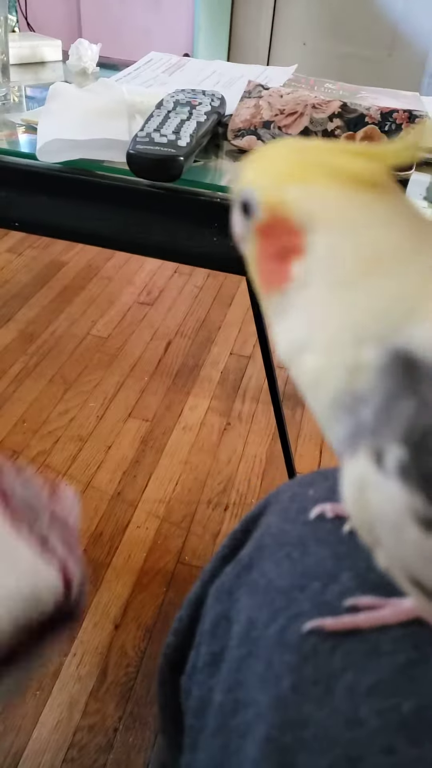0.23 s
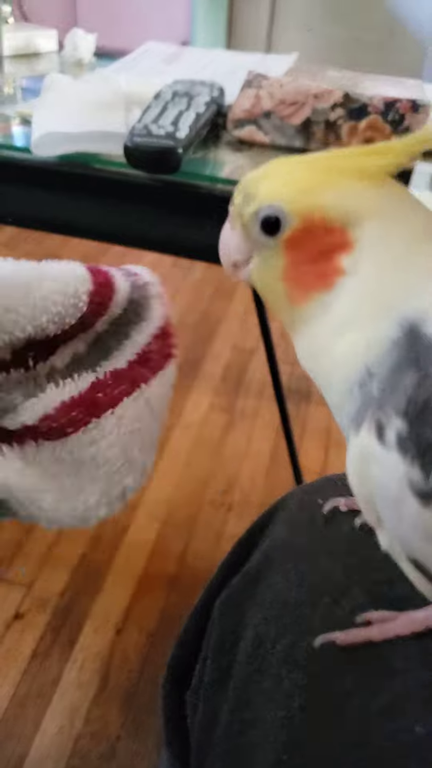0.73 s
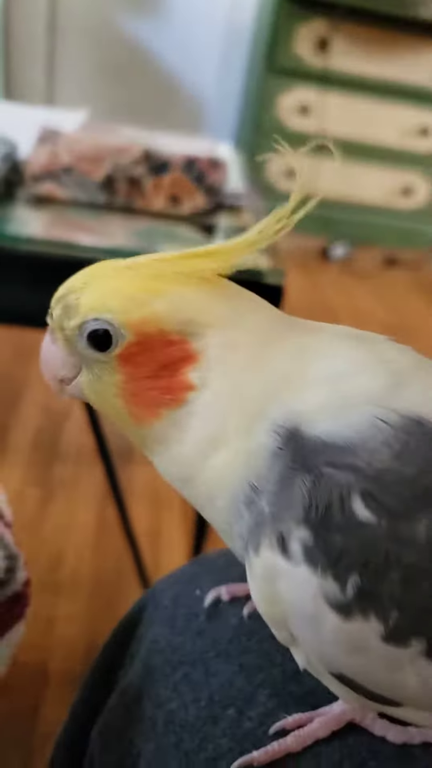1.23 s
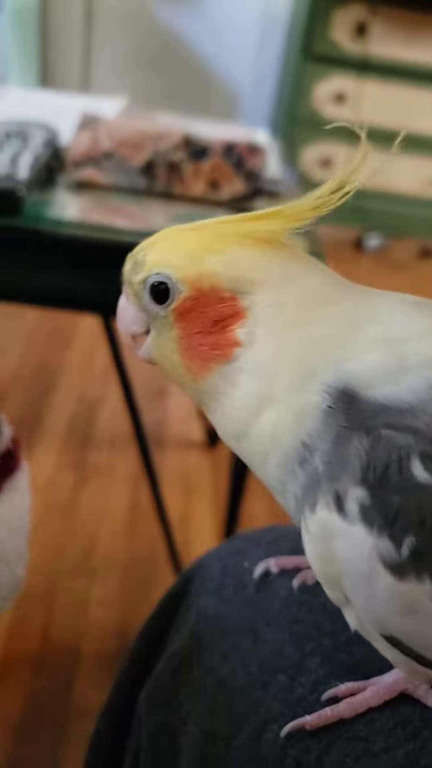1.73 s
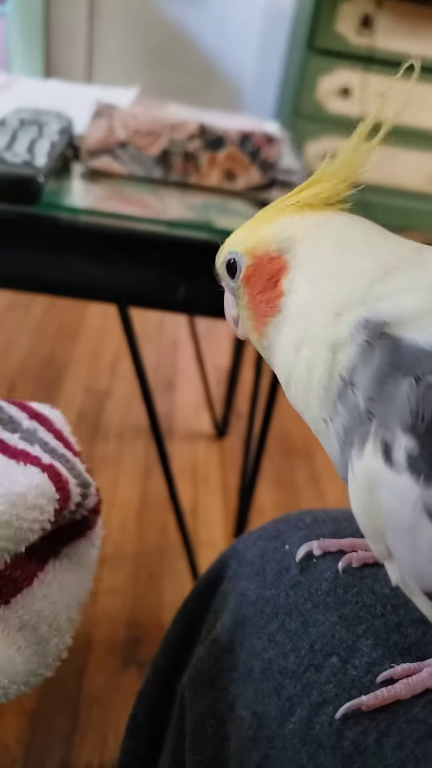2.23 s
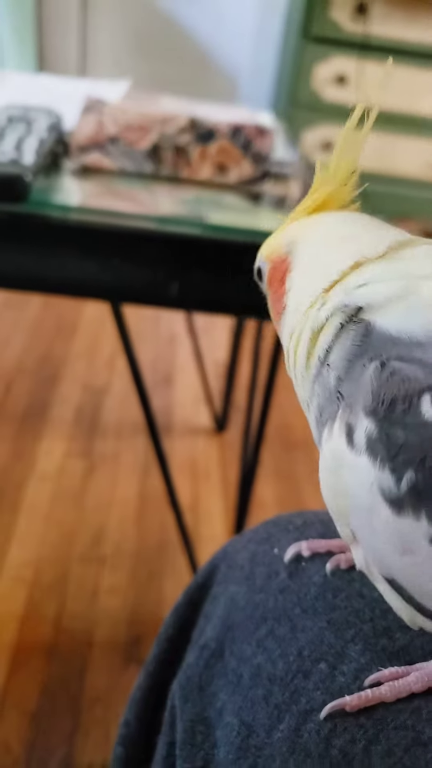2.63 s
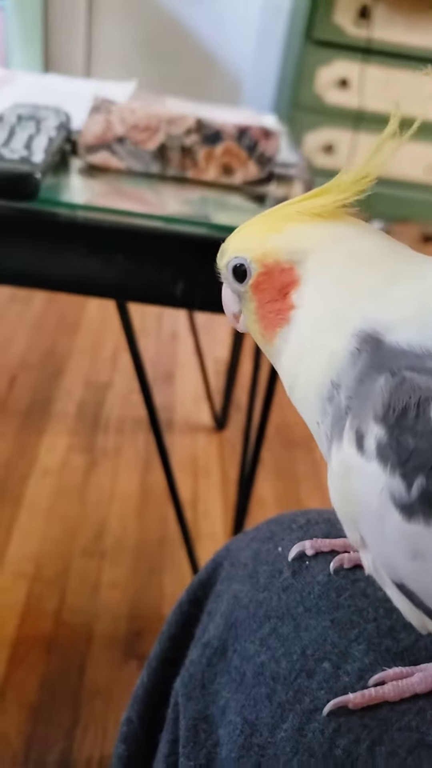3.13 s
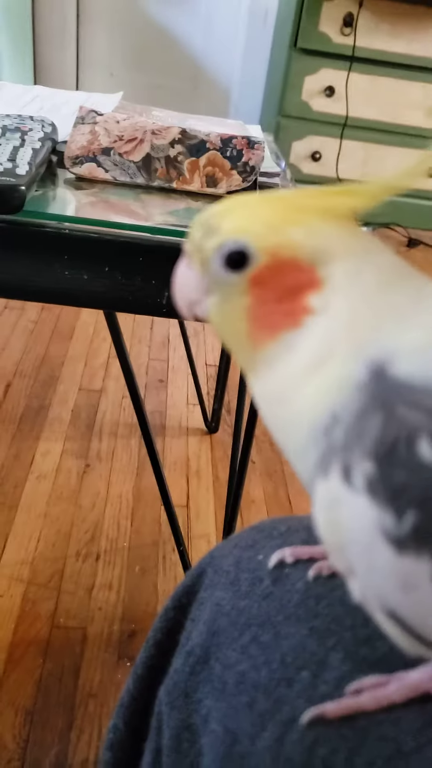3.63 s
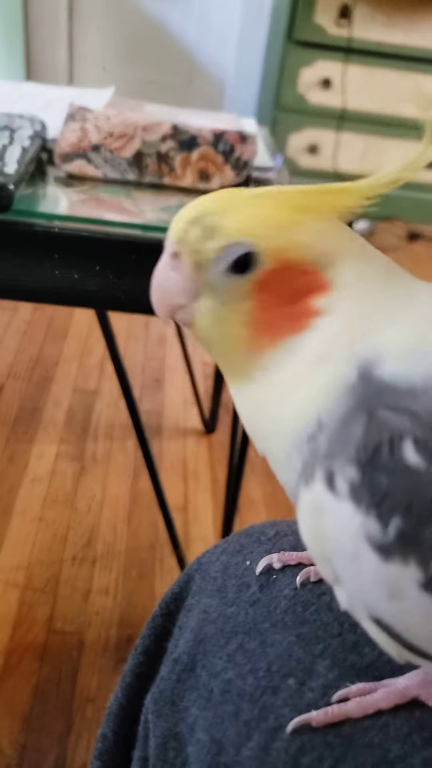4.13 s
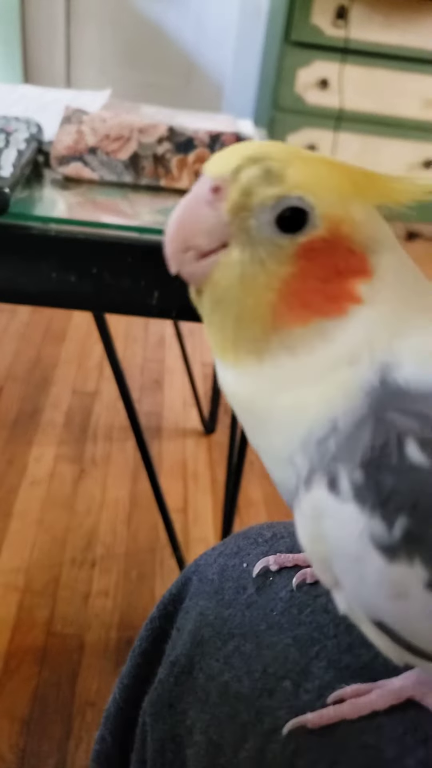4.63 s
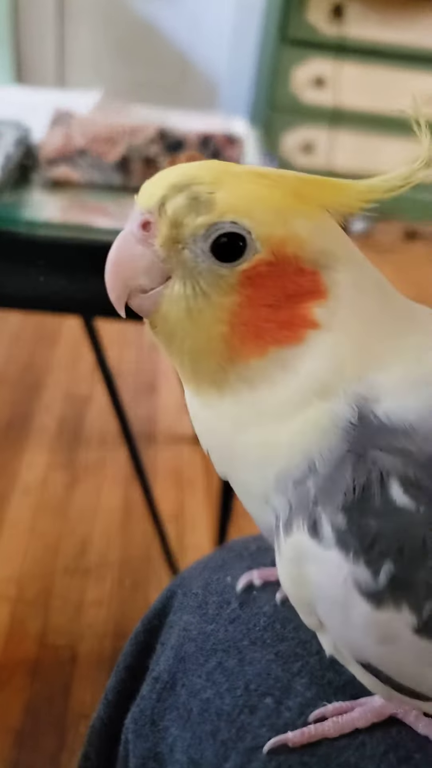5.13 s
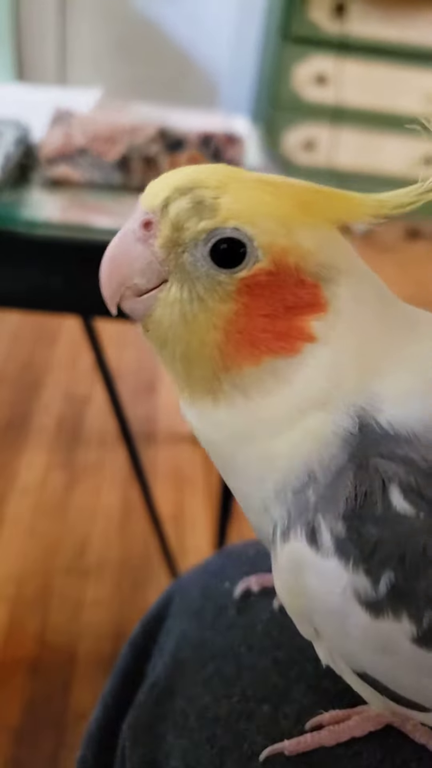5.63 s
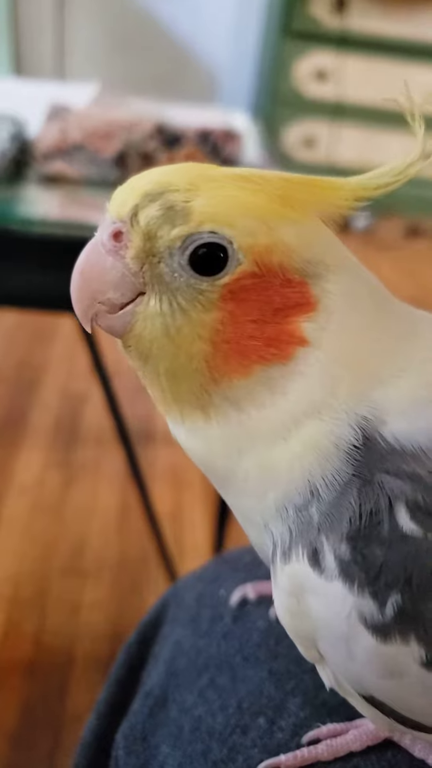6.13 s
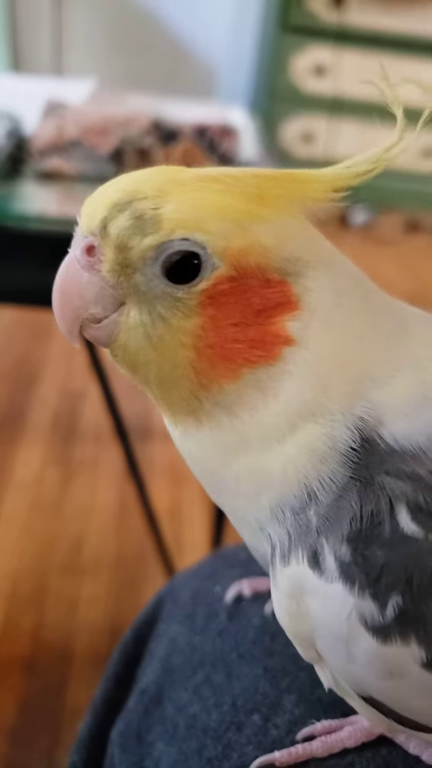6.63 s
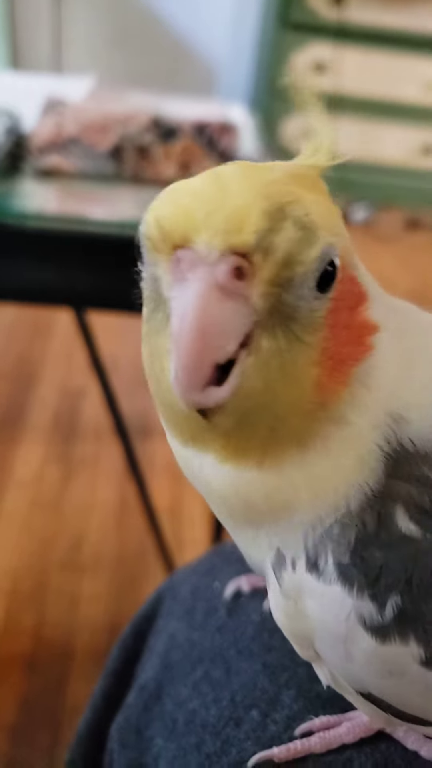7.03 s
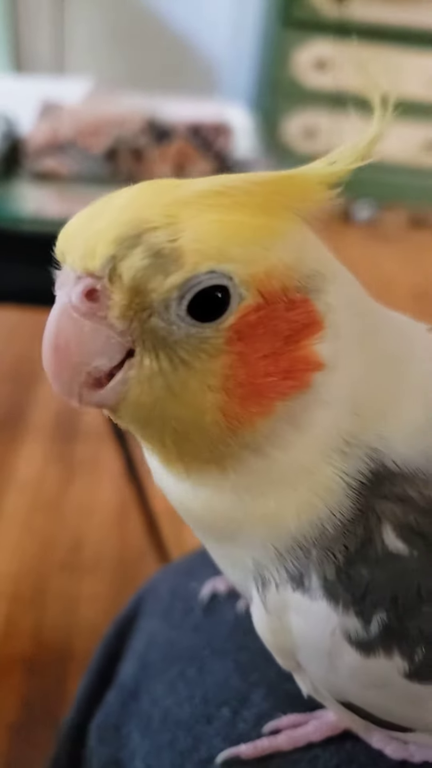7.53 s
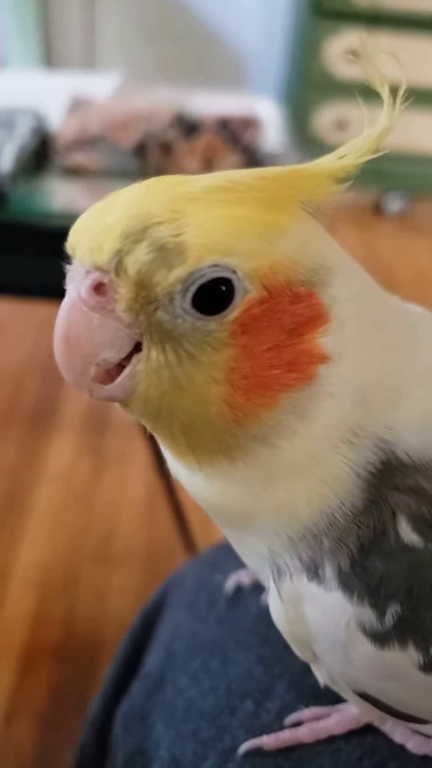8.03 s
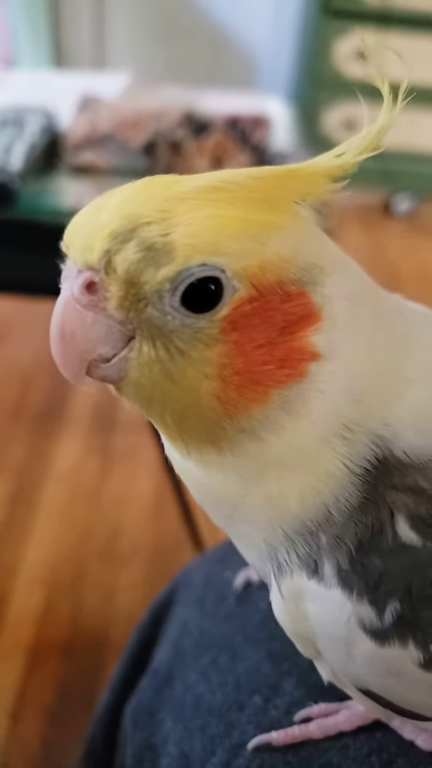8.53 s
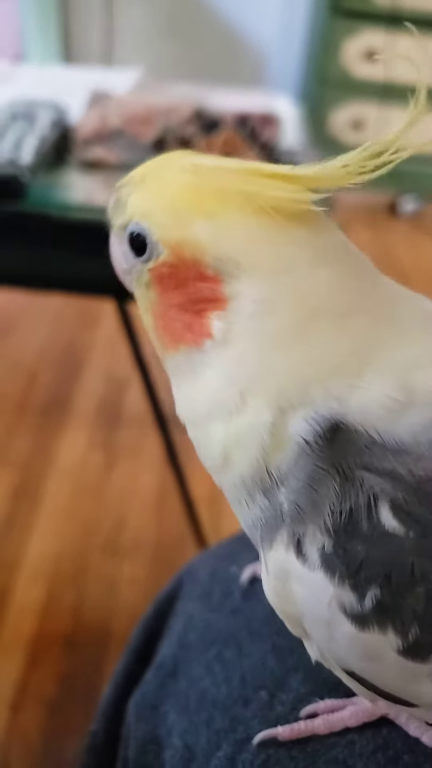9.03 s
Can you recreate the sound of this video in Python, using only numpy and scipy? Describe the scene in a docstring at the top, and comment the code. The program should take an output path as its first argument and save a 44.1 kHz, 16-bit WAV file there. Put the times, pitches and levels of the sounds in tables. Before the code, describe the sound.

A cockatiel sings close to a phone in a quiet living room with a faint low hum and short, lively reflections. From 0 to 1.1 s, bright chirps and stepping whistles come quickly, the loudest near 0.3 and 0.8 s, the last turning raspy. From 1.25 to 2.6 s more short chirps and rising whistles follow, some buzzy or split to half pitch. Softer chirps and hoarse wheezing lead to a screech at 3.2-3.5 s, cracking from low to thin high voice. A faint rustle passes around 4.1 s; chirps with a tiny squeak at 4.3-4.6 s precede a strong whistle at 4.7 s that drops sharply. Near silence follows, with a very soft rustle at 5.6 s. Two short peeps at 6 s lead to a clear whistle at 6.3 s. From 6.9 to 8.3 s, a nasal, rapid warble runs on, ending with a weaker breaking screech until 8.6 s, then quiet hum.

```python
"""Arched chirps and stepping whistles, rich in overtones, ring out close to a phone in a living room.
A cockatiel sings them on someone's knee, over a wooden floor: stacks of harmonics on a gliding pitch.
Some notes split to half pitch, some turn raspy as pitch and level shake, and two phrases end in a
two-voiced screech. Hoarse air and thin squeaks join in; noise makes the low room hum and cloth rustle.
The two microphones differ in level and phase; decaying noise gives the room's reflections."""
import sys
import numpy as np
from scipy import signal
from scipy.fft import rfft, irfft, next_fast_len
from scipy.io import wavfile

SR = 44100
rng = np.random.default_rng(int(sys.argv[2]) if len(sys.argv) > 2 else 0)


def generate_wav(sig):
    """Save sig (samples, or channels by samples) to the path in sys.argv[1] as 16-bit PCM at SR."""
    pcm = np.round(np.clip(np.atleast_2d(sig).T, -1, 1) * 32767).astype(np.int16)
    wavfile.write(sys.argv[1], SR, pcm)


N = 409248

# room background: (frequency [Hz], density [dB per Hz])
HUM_SPECTRUM = [(25, -27), (100, -1.5), (160, -18.5), (320, -21.5), (900, -40), (2200, -32), (3500, -44.5),
                (15000, -49)]
# chirps, one arch of pitch on a glide: (start [s], length [s], pitch [Hz], glide [semitones],
# arch [semitones], level [dB], second harmonic [dB], upper overtones [dB])
CHIRP_CALLS = [(0.025, 0.023, 1640, -2.5, 1.7, -31.5, 5, -6),
               (0.569, 0.089, 1641, 1.5, 1.3, -25, 3.5, -2.5),
               (0.726, 0.058, 1965, 4, 1.2, -27, -13.5, -13.5),
               (0.825, 0.17, 2030, 0.3, 1.45, -14.5, -5.5, -8.5),
               (1.0, 0.12, 2118, -2, 1.2, -32.5, -9.5, -9.5),
               (1.255, 0.085, 1506, -1.5, 2.24, -29, -2.5, -4),
               (1.431, 0.086, 1986, -0.4, -0.29, -19.5, -2.5, -3),
               (1.525, 0.05, 2016, 4.5, -1.83, -28.5, -13.5, -9.5),
               (1.838, 0.066, 1746, -3, -1.1, -31.5, -7.5, 0),
               (2.52, 0.089, 2009, 2, 1.6, -33, -8.5, -10.5),
               (2.725, 0.066, 1587, 2.5, -0.082, -28.5, -20, -10),
               (2.89, 0.073, 1770, -0.1, -0.54, -29.5, -17, -10.5),
               (3.075, 0.082, 1709, -1, 0.018, -31, -15, -10),
               (4.334, 0.041, 1353, -1, 0.7, -29.5, -0.5, 1.5), (4.394, 0.086, 1501, 3, 1, -25.5, 1.5, 1),
               (4.544, 0.082, 1799, -4.5, -1.67, -18.5, 4, -1.5),
               (5.98, 0.04, 1679, -1, 0.93, -26.5, -5, 1.5),
               (6.155, 0.041, 1821, -0.5, -0.36, -25.5, -12.5, -18.5),
               (6.937, 0.11, 1701, 1.33, 0.17, -19.5, 8.5, 5.5), (7.075, 0.18, 1728, 0.9, 1.04, -22, 4, 4),
               (7.547, 0.07, 1725, 2.5, -0.66, -23.5, -4, 6), (7.731, 0.087, 1611, 1, 0.87, -25, -5.5, 1),
               (7.877, 0.11, 1697, -0.5, 2.05, -24.5, -1, 5),
               (7.962, 0.063, 1620, -0.7, 0.14, -26.5, -3.5, 0),
               (8.025, 0.16, 1724, -1.17, 2, -21.5, -1.5, 2.5),
               (8.178, 0.052, 1570, 0.8, -0.47, -29, -32, -6), (8.235, 0.1, 1773, 1, 0.9, -33, -12, -9.5)]
# whistles hold a pitch, step quickly (mostly up, once slightly down) and fall away:
# (start [s], length [s], held pitch [Hz], reached pitch [Hz], step after [s], fall [semitones],
# fall time [s], level [dB], second harmonic [dB], upper overtones [dB])
WHISTLE_CALLS = [(.129, 0.11, 1786, 2062, 0.069, 0.46, 0.012, -18.5, -6, -5.5),
                 (.287, 0.15, 2096, 2000, 0.052, 0.69, 0.04, -15.5, -7.5, -13.5),
                 (1.69, 0.077, 1600, 1862, 0.041, 1.06, 0.019, -26.5, -0.5, 2.5),
                 (2.028, 0.084, 1636, 1910, 0.044, 2, 0.0093, -24, -1, 0),
                 (2.206, 0.13, 1736, 1879, 0.029, 0.56, 0.1, -24.5, -6, -2.5),
                 (2.345, .16, 1900, 2136, 0.029, 2.68, 0.066, -18.5, -6, -7.5),
                 (4.71, .26, 1683, 1987, .12, 7, .025, -15, -4, -2.5),
                 (6.317, 0.24, 1729, 1957, 0.083, 8.9, 0.023, -16, -10, -9),
                 (7.297, 0.12, 1832, 2195, 0.032, 3.29, 0.077, -17.5, -3.5, -1)]
# the syrinx vibrates chaotically: (start [s], end [s], rasp [0-1])
RASP_SPANS = [(1.023, 1.105, 0.79), (1.309, 1.345, 0.29), (1.845, 1.876, 0.58), (2.203, 2.224, 0.41),
              (2.503, 2.579, 0.72), (4.46, 4.486, 0.7), (4.541, 4.557, 0.44), (7.225, 7.246, 0.36),
              (8.234, 8.272, 0.74)]
# strong and weak cycles alternate, giving lines at half the pitch: (start [s], end [s])
SPLIT_SPANS = [(1.255, 1.31), (1.528, 1.567), (1.676, 1.725), (2.02, 2.065), (4.73, 4.795), (7.554, 7.597),
               (7.744, 7.795), (7.967, 7.998), (8.182, 8.222)]
# colour of windpipe and beak: (frequency [Hz], gain [dB])
THROAT_COLOUR = [(400, -34.5), (800, -7.5), (1700, 7.5), (3400, 4), (3800, -0.5), (5200, -10),
                 (6300, -22.5), (8400, -29), (9600, -47.5), (11300, -25.5), (13200, -30.5), (14700, -19.5)]
# turbulent air, before the throat colours it: (frequency [Hz], density [dB per Hz])
AIR_SPECTRUM = [(800, 2.5), (1500, -17), (2100, -1.5), (3000, 0), (3600, -13), (5000, -0.5)]
# the bird moves its head: (time [s], left-right level [dB])
HEAD_BALANCE = [(0.548, 16.5), (0.851, 7), (2.898, 10)]
# left-right balance of the two microphones, on top of the head's own: (frequency [Hz], level [dB])
MIC_BALANCE = [(2000, 2.5), (7000, -14)]
# sound reaches the left microphone first, bent round the phone: (frequency [Hz], phase lead [radians])
MIC_PHASE = [(1650, 2.5), (2000, 0.089), (2750, 0.19), (3250, 3.67), (5100, 5.43), (15000, 21.13)]
# reverberation time of the room: (frequency [Hz], decay by 60 dB [s])
ROOM_DECAY = [(2500, 0.3), (12000, 0.52)]
# hoarse rasping that carries on between notes: (start [s], end [s], level [dB])
HOARSE_SPANS = [(0.253, 0.296, -43.5), (2.772, 2.947, -47.5), (2.95, 3.113, -42.5)]
# screeches break from a low voice to a high one:
# (start [s], break [s], end [s], low pitch [Hz], high pitch [Hz], level [dB])
SCREECH_CALLS = [(3.203, 3.303, 3.472, 1751, 2750, -26), (8.342, 8.414, 8.603, 1676, 2811, -34)]
# the wide-open beak colours the screeches further: (frequency [Hz], gain [dB])
BEAK_COLOUR = [(5000, -1.5), (10000, 10), (14000, -22)]
# cloth and feathers rustle: (start [s], end [s], level [dB])
RUSTLE_SPANS = [(4.08, 4.288, -57.5), (5.628, 5.833, -61)]
# colour of the rustle: (frequency [Hz], density [dB per Hz])
CLOTH_SPECTRUM = [(70, 3.5), (9000, -33.5)]
# thin squeaks where the voice cracks: (start [s], length [s], pitch [Hz], glide [semitones], level [dB])
SQUEAK_CALLS = [(4.538, .005, 4400, 0, -21), (7.243, .045, 3450, -6, -37), (7.293, .005, 4450, -2, -30)]

TIME = np.arange(N) / SR
HUM_DB = -66.5
CUTOFF_HZ, FULL_SCALE = 16100, .95
# breath: loudness per semitone [dB], drop at both ends [dB], attack [s], release [s]
BREATH = (1.6, 8.8, .006, .038)
SCREECH_BREATH = (0, 4, .005, .008)   # high voice only
SWELL_LEAN = 1.125   # above 1, the breath is strongest a little after the middle of a call
# a call starts flat by about this share of its pitch and settles with a dying wobble
SAG, SETTLE_S, SETTLE_HZ = .045, .02, 24.54
# random wavering of the pitch: share, highest rate
WAVER, WAVER_HZ = .008, 55
SMEAR = 1.1   # overtone phase jitter at full rasp [radians per harmonic], before its cap
# least rasp (0-1) of a split tone and of a straining or starting voice; most of a screech's high voice
SPLIT_RASP, STRAIN_RASP, SCREECH_RASP = .05, .18, .38
SPLIT_DB = -21   # half-pitch lines, about which they waver
RASP_EDGE_S, SQUEAK_EDGE_S = .009, .004
WHISTLE_STEP_S = 0.013
HOARSE_HZ = 1980
STUTTER_HZ, STUTTER_DEPTH = 85, .6


def from_db(db):
    """Turns decibels into an amplitude ratio."""
    return 10 ** (np.asarray(db) / 20)


def rms_one(x):
    """Scales a signal to an RMS level of 1."""
    return x / np.sqrt(np.mean(x ** 2) + 1e-20)


def at_hz(points, hz):
    """Reads a spectrum on a log-frequency axis."""
    points = np.array(points, float)
    return np.interp(np.log(np.maximum(hz, 1)), np.log(points[:, 0]), points[:, 1])


def coloured(x, points):
    """Filters by a spectrum of (frequency [Hz], gain [dB])."""
    size = next_fast_len(x.shape[-1])
    hz = np.arange(size // 2 + 1) * SR / size
    spectrum = rfft(x, size) * from_db(at_hz(points, hz))
    return irfft(spectrum, size)[..., :x.shape[-1]]


def flutter(size, rate_hz):
    """Random wavering up to the given rate, spread 1."""
    sos = signal.butter(4, min(rate_hz, SR / 4), fs=SR, output="sos")
    noise = rng.standard_normal(size + SR // 10)   # the filter settles during the extra tenth of a second
    return rms_one(signal.sosfilt(sos, noise)[-size:])


def gate(t, start, end, rise_s, fall_s):
    """Opens and closes with smooth edges centred on start and end."""
    opening = np.clip((t - start) / rise_s + .5, 0, 1)
    closing = np.clip((end - t) / fall_s + .5, 0, 1)
    return np.sin(opening * closing * np.pi / 2) ** 2


def stereo_noise(spectrum, alike):
    """Noise of the given colour, partly shared by the two microphones."""
    alike = np.clip(alike, 0, 1)
    mid, side = rng.standard_normal((2, N))
    pair = np.sqrt(1 + alike) * mid + np.sqrt(1 - alike) * side * np.array([[1], [-1]])
    return rms_one(coloured(pair, spectrum))


def semitones(steps):
    """Turns semitones into a frequency ratio."""
    return 2 ** (steps / 12)


def around(start, end):
    """The samples of a call, with room for its attack and release."""
    return slice(max(int((start - BREATH[-1]) * SR), 0), int((end + BREATH[-1]) * SR))


def hum():
    """Low room background: steady coloured noise, nearly alike at both microphones."""
    return from_db(HUM_DB) * stereo_noise(HUM_SPECTRUM, alike=0.89)


def arch(t, length_s, hz, glide, height):
    """Pitch of a chirp: a steady glide with one smooth hump, or a dip where the height is negative."""
    along = t / length_s
    hump = np.sin(np.pi * along) ** 2 - .5
    return hz * semitones(glide * (along - .5) + height * hump)


def syllable(t, length_s, pitch, breath, colours, level_db, second_db, overtones_db, rasp, split, air,
             pan_db, chaos=0.085, chaos_hz=420, shudder=0.22, shudder_hz=200, flicker_db=3, flicker_hz=25,
             effort=0.11, air_db=-10, catch_s=0.0073, dull_db=-9):
    """Harmonics on one gliding pitch; rasp shakes pitch and level, smears overtones and lets air through."""
    # the breath swells towards the middle of the call, and higher is louder
    db_per_semitone, ends_db, attack_s, release_s = breath
    along = np.clip(t / length_s, 0, 1) ** SWELL_LEAN
    swell_db = db_per_semitone * 12 * np.log2(pitch) - ends_db * (2 * along - 1) ** 2
    swell_db = swell_db - swell_db[(t > 0) & (t < length_s)].max()

    # the syrinx catches roughly as it starts; its pitch begins flat, overshoots, settles, and sags as it stops
    rasp = np.maximum(rasp, STRAIN_RASP * np.exp(-abs(t) / catch_s))
    settling = np.exp(-abs(t) / SETTLE_S) * np.cos(2 * np.pi * SETTLE_HZ * t)
    stopping = np.exp(-abs(t - length_s) / catch_s)
    waver = WAVER * flutter(len(t), WAVER_HZ)
    chaotic = chaos * rasp * flutter(len(t), chaos_hz)
    pitch = pitch * (1 - SAG * (settling + stopping) + waver + chaotic)
    phase = 2 * np.pi * np.cumsum(pitch) / SR

    shake = shudder * rasp
    level = from_db(level_db + swell_db) * gate(t, attack_s / 4, length_s, rise_s=attack_s, fall_s=release_s)
    level = level * np.exp(shake * flutter(len(t), shudder_hz) - shake ** 2)
    # the second harmonic swells faster than the fundamental as the bird pushes harder
    push_db = effort * swell_db
    side = np.array([[.5], [-.5]])   # left, right
    out = level * air * rasp * from_db(air_db + side * pan_db)

    for k in np.arange(1, 23) / 2:   # harmonic number; halves are the split tone
        hz = k * pitch
        gain, smear = 1, 0
        if k != 1:
            if k == 2:
                lift_db = second_db + push_db
            else:
                lift_db = overtones_db * (k > 2) + flicker_db * flutter(len(t), flicker_hz)
            # chaotic vibration loses its sharp closure, the more so for each octave up
            lift_db = lift_db + dull_db * rasp * np.log2(max(k, 1))
            colour_db = sum(at_hz(colour, hz) for colour in colours)
            gain = from_db(colour_db + lift_db) * (split if k % 1 else 1)
            smear = np.minimum(SMEAR * rasp * k, 2) * flutter(len(t), shudder_hz)
        ears = from_db(side * (pan_db + at_hz(MIC_BALANCE, hz)))
        ears = ears / np.sqrt(np.mean(ears ** 2, axis=0))
        tone = np.sin(k * phase + smear + side * at_hz(MIC_PHASE, hz))
        out += np.sqrt(2) * level * gain * ears * (hz < CUTOFF_HZ) * tone
    return out


def room(x, early_db=-21, early_s=0.046, tail_db=-21):
    """Quick diffuse reflections, then a tail with its own decay per band, fed by the left microphone."""
    t = TIME[:SR]
    edges = np.geomspace(300, 18000, 8)
    tail = 0
    for low, high in zip(edges, edges[1:]):
        middle_hz = np.sqrt(low * high)
        sos = signal.butter(2, [low, high], "band", fs=SR, output="sos")
        band = signal.sosfilt(sos, rng.standard_normal((2, len(t))))
        tail = tail + band * from_db(-60 * t / at_hz(ROOM_DECAY, middle_hz))
    # scaled by the energy of a decay at 2 kHz
    tail = tail * (t > .006) / np.sqrt(np.sum(from_db(-60 * t / at_hz(ROOM_DECAY, 2000)) ** 2))
    early = rng.standard_normal((2, len(t))) * np.exp(-t / early_s) * (t > .002)
    early = early / np.sqrt(np.sum(early ** 2, axis=1, keepdims=True))
    response = from_db(early_db) * early + from_db(tail_db) * tail
    return signal.fftconvolve(x[:1], response, axes=1)[:, :N]


def step_and_fall(t, length_s, held_hz, reached_hz, after_s, fall, fall_s):
    """Pitch of a whistle: held, then a quick step to another, then an ever faster fall as the breath runs out."""
    stepped = (1 + np.tanh((t - after_s) / WHISTLE_STEP_S)) / 2
    falling = fall * np.exp((t - length_s) / fall_s)
    return (held_hz + (reached_hz - held_hz) * stepped) * semitones(-falling)


def hoarseness(air, grit_db=2, grit_hz=160, wander=.05, wander_hz=40, tone_db=0):
    """Air wheezes through the half-closed syrinx and carries a wandering tone."""
    pitch = HOARSE_HZ * (1 + wander * (flutter(N, wander_hz) + flutter(N, grit_hz) / 2))
    tone = from_db(tone_db) * np.sin(2 * np.pi * np.cumsum(pitch) / SR)
    level = sum(from_db(db) * gate(TIME, a, b, rise_s=.02, fall_s=.02) for a, b, db in HOARSE_SPANS)
    return level * rms_one((air + tone) * from_db(grit_db * flutter(N, grit_hz)))


def screeches(air, pan_db, strain=3.2, strain_s=0.025, second_db=-4, scoop=2.7, fall=11, fall_s=0.0066,
              thin_db=-13):
    """A breathy low voice strains upwards and fades; a thin high one breaks in, stutters and swoops down."""
    out = np.zeros((2, N))
    for start, break_s, end, low_hz, high_hz, db in SCREECH_CALLS:
        span = around(start, end)
        t, since = TIME[span] - start, TIME[span] - break_s
        rising = (1 + np.tanh(since / strain_s + 1)) / 2
        low_pitch = low_hz * semitones(strain * rising)
        low = syllable(t, 2 * (break_s - start), low_pitch, BREATH, [THROAT_COLOUR, BEAK_COLOUR],
                       db, second_db, 0, STRAIN_RASP, from_db(SPLIT_DB), air[:, span] / 2, pan_db[span])

        length_s = end - break_s
        held = np.clip(since, 0, length_s)
        unsteady = 1 - (held / length_s) ** 2
        beat_hz = STUTTER_HZ * (1 + flutter(len(t), STUTTER_HZ) / 2)
        beat = unsteady * np.sin(2 * np.pi * np.cumsum(beat_hz) / SR)
        scooping = scoop * np.exp(-held / strain_s)
        falling = fall * np.exp((held - length_s) / fall_s)
        high_pitch = high_hz * semitones(beat / 2 - scooping - falling)
        high = syllable(since, length_s, high_pitch, SCREECH_BREATH, [THROAT_COLOUR], db, thin_db, thin_db,
                        SCREECH_RASP * (1 + unsteady) / 2, 0, air[:, span], pan_db[span])
        # after the break the low voice dies away under the high one
        stutter = 1 - STUTTER_DEPTH * np.clip(2 * beat, 0, 1)
        out[:, span] = low * np.exp(-held / strain_s) + high * stutter
    return out


def rustle():
    """Uneven brushing of cloth and feathers: noise heaviest in the bass, its level flickering."""
    brush = sum(from_db(db) * gate(TIME, a, b, rise_s=0.023, fall_s=0.38) for a, b, db in RUSTLE_SPANS)
    return brush * from_db(1.5 * flutter(N, 25)) * stereo_noise(CLOTH_SPECTRUM, alike=0.77)


def squeaks():
    """Thin steady or falling pure tones where the voice cracks."""
    out = 0
    for start, length_s, hz, glide, db in SQUEAK_CALLS:
        pitch = arch(np.clip(TIME - start, 0, length_s), length_s, hz, glide, 0)
        level = from_db(db) * gate(TIME, start, start + length_s, rise_s=SQUEAK_EDGE_S, fall_s=SQUEAK_EDGE_S)
        out = out + np.sqrt(2) * level * np.sin(2 * np.pi * np.cumsum(pitch) / SR)
    return out


def cockatiel():
    """Sings with one syrinx, throat and head; returns the song, its rasp (0-1) and the screeches."""
    edges = dict(rise_s=RASP_EDGE_S, fall_s=RASP_EDGE_S)
    rasp = sum(np.clip(amount, 0, 1) * gate(TIME, a, b, **edges) for a, b, amount in RASP_SPANS)
    splitting = sum(gate(TIME, a, b, **edges) for a, b in SPLIT_SPANS)
    rasp = np.maximum(rasp, SPLIT_RASP * splitting)
    split = from_db(SPLIT_DB + 4 * flutter(N, 70)) * splitting
    pan_db = np.interp(TIME, *np.transpose(HEAD_BALANCE))
    air = rms_one(coloured(stereo_noise(AIR_SPECTRUM, alike=0.66), THROAT_COLOUR))

    song = hoarseness(air) + squeaks()
    for calls, tune in (CHIRP_CALLS, arch), (WHISTLE_CALLS, step_and_fall):
        for start, length_s, *shape, level_db, second_db, overtones_db in calls:
            span = around(start, start + length_s)
            t = TIME[span] - start
            pitch = tune(np.clip(t, 0, length_s), length_s, *shape)
            song[:, span] += syllable(t, length_s, pitch, BREATH, [THROAT_COLOUR], level_db, second_db,
                                      overtones_db, rasp[span], split[span], air[:, span], pan_db[span])
    return song, rasp, screeches(coloured(air, BEAK_COLOUR), pan_db)


def scene(turned_db=12, screech_room_db=10):
    """Harsh calls are thrown more widely into the room than the whistles aimed at the phone."""
    song, rasp, screech = cockatiel()
    thrown = song * from_db(turned_db * rasp) + screech * from_db(screech_room_db)
    return song + screech + room(thrown) + rustle() + hum()


def record(dry):
    """Peaks beyond full scale are clipped and the top is cut steeply at both microphones."""
    clipped = np.clip(dry, -FULL_SCALE, FULL_SCALE)
    return signal.sosfilt(signal.ellip(10, .1, 80, CUTOFF_HZ, fs=SR, output="sos"), clipped)


dry = scene()
out = record(dry)
generate_wav(out)
```